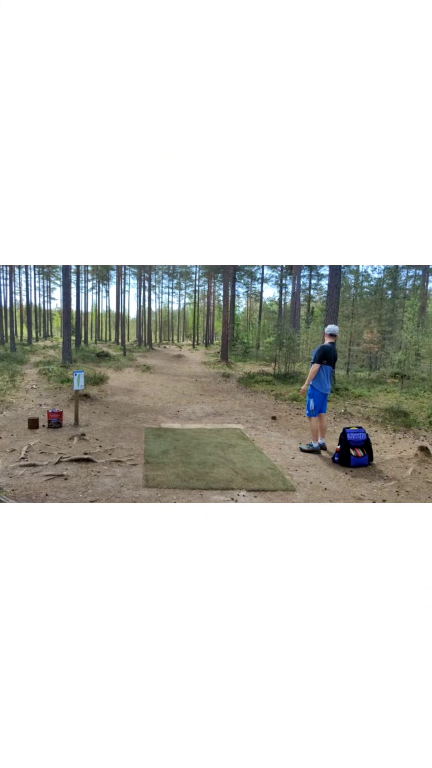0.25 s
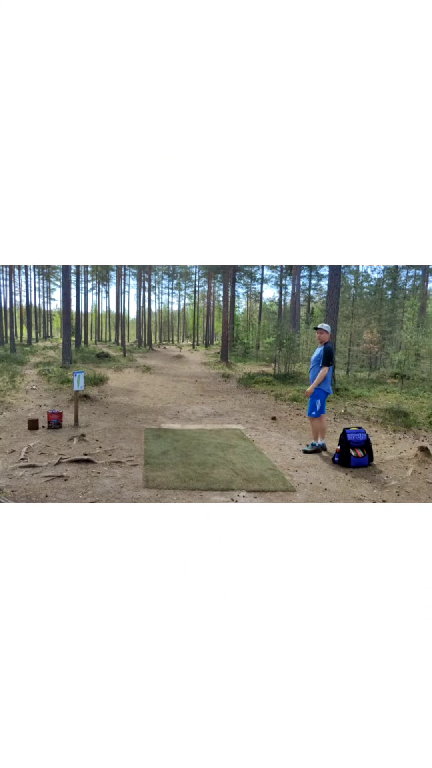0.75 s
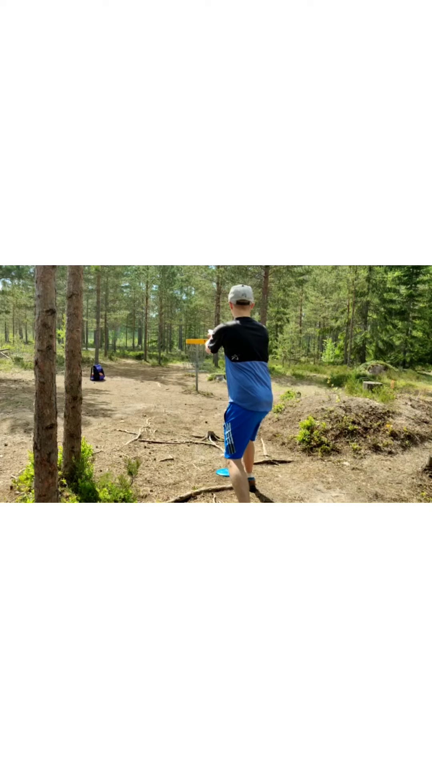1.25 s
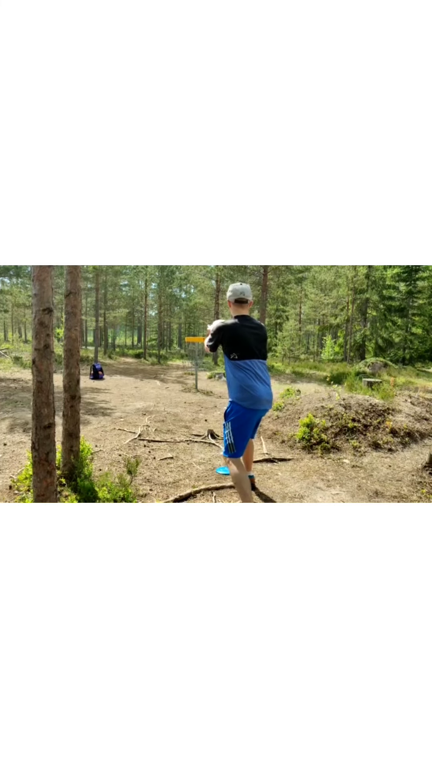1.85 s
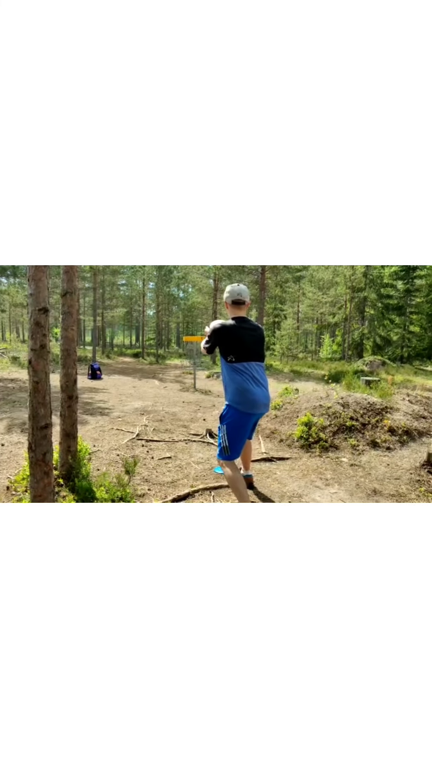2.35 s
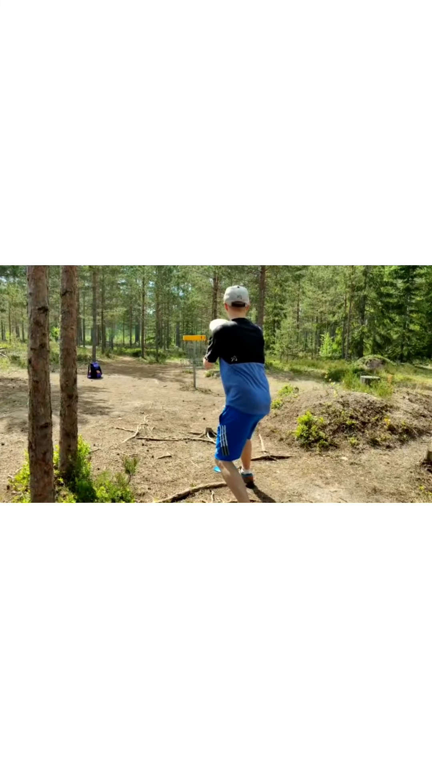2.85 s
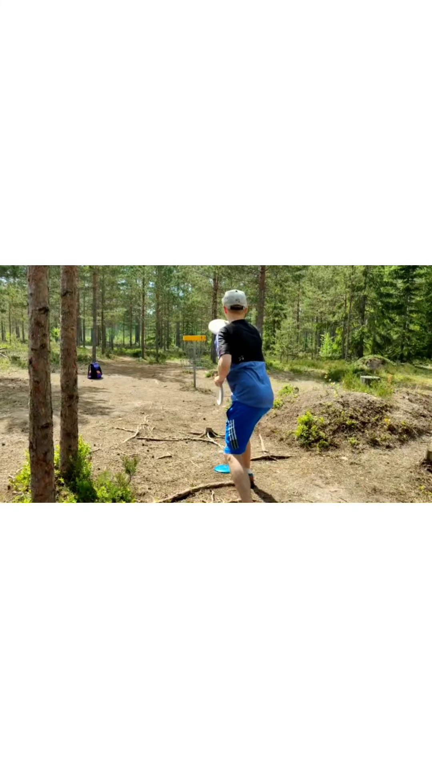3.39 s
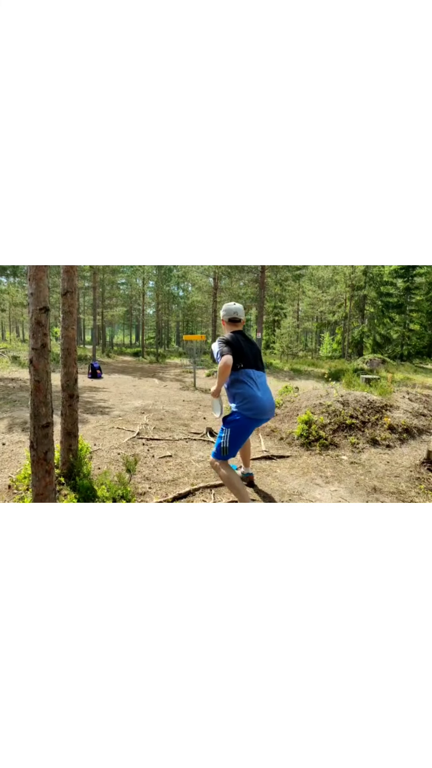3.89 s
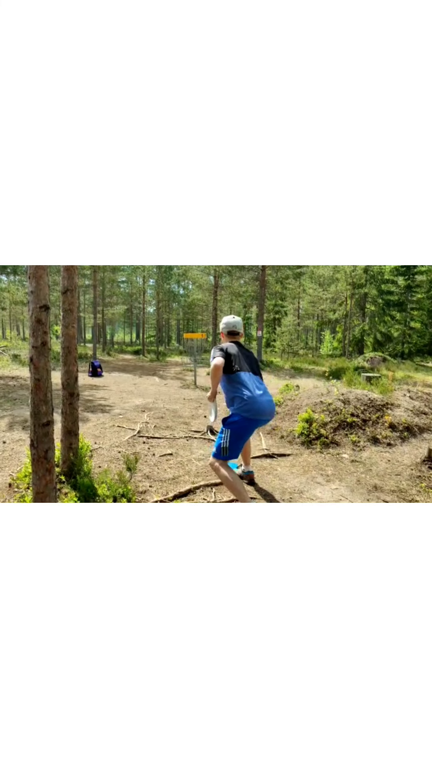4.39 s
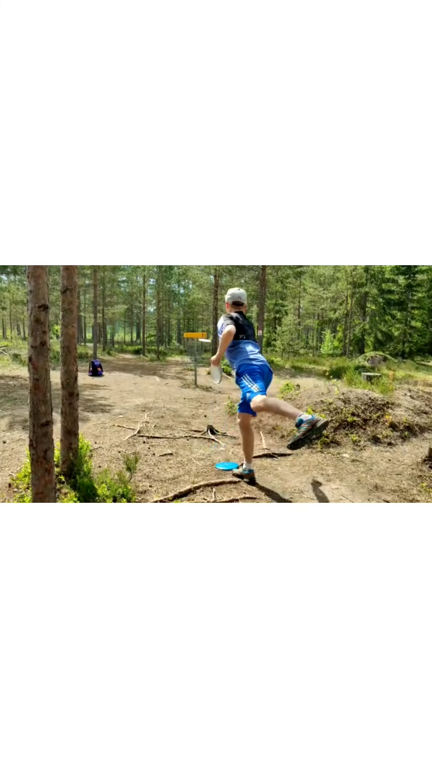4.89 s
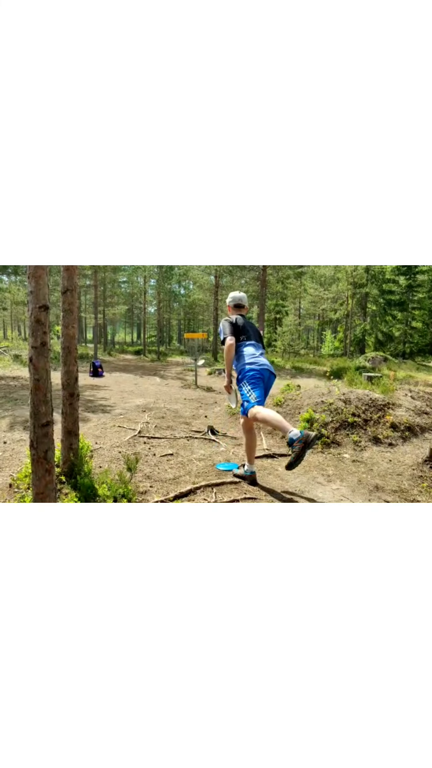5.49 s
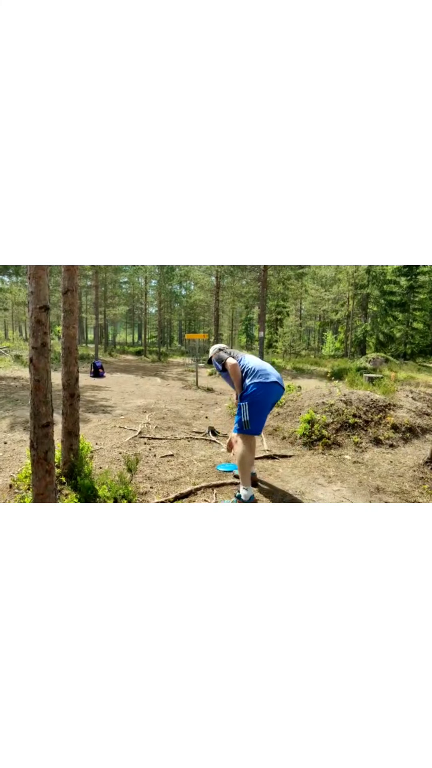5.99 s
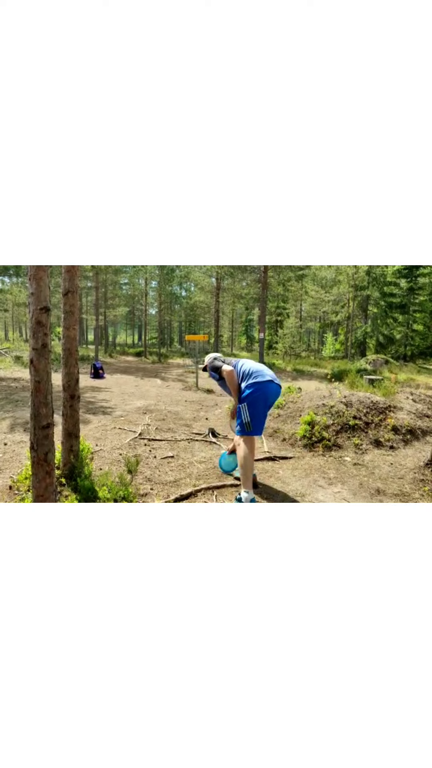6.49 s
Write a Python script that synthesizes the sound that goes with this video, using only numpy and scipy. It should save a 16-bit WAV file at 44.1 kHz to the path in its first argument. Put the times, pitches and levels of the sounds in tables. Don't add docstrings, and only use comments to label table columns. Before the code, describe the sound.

Quiet pine forest with far traffic and birdsong, a brief dropout, a soft throwing snap, then a disc crashes into steel chains that jangle and settle.

```python
import sys
import numpy as np
from scipy import signal
from scipy.fft import rfft, irfft, next_fast_len
from scipy.io import wavfile
from scipy.ndimage import uniform_filter1d, map_coordinates

SR = 44100
rng = np.random.default_rng(int(sys.argv[2]) if len(sys.argv) > 2 else 0)


def unload_wav(signal):
    wavfile.write(
        sys.argv[1],
        SR,
        np.round(np.clip(np.atleast_2d(signal).T, -1, 1) * 32767).astype(np.int16),
    )


def amplitude_ratio(level_db):
    exponent = np.asarray(level_db, float) / 20
    return 10 ** exponent


N = 297410

# (time [s], level [dB])
VIEW_GAIN = [
    (.9635, 9),
    (.9645, -89),
    (1.165, -49),
    (1.167, -7.5),
    (1.2, -5),
    (1.3, 2),
]
TOP_HZ = 15830

# (time [s], peak level [dB], length [s])
GUSTS = [
    (0.306, -57, 0.13),
    (0.434, -62, 0.051),
    (0.555, -50, 0.013),
    (0.713, -46.5, 0.065),
    (0.772, -44, 0.039),
    (0.916, -61, 0.03),
    (0.957, -44, 0.021),
]
# (frequency [Hz], density [dB per Hz])
RUMBLE = [(13, -36), (22, -3.5), (34, -2), (59, 3.5), (86, 1.5), (108, -7), (260, -24.5), (340, -56),
          (570, -120)]
# (frequency [Hz], density [dB per Hz])
ROAR_FIRST = [(120, -54), (200, -45), (265, -12), (308, -16.5), (431, -14.5), (845, 0.5), (1320, -4),
              (1700, -9.5), (3080, -35), (5000, -45), (6500, -76), (11000, -120)]
ROAR = [(120, -28), (200, -8), (292, -2), (507, -6), (595, -7), (690, -9), (967, 1.5), (1150, 3.5),
        (2140, -8), (3210, -48), (4370, -30.5), (5000, -34), (6500, -80), (11000, -120)]
# (frequency [Hz], density [dB per Hz])
HISS = [(2350, -46), (4000, -7), (5570, -6.5), (5820, -6.5), (7360, 1), (8580, -2), (10400, 0), (12100, -3),
        (13500, 4), (15600, -3)]
# (frequency [Hz], correlation [-])
ALIKE = [(60, 1), (130, 0.94), (290, 0.89), (640, 0.45), (1410, 0.013), (3100, 0.3), (6820, 0.49),
         (15000, 0.84)]
RUMBLE_DB, ROAR_DB, HISS_DB = (-61, -57.5), (-60.5, -61), (-82.5, -76.5)
BUILDS_DB_PER_S = 3
RUMBLE_DRIFT_DB, ROAR_DRIFT_DB, HISS_PATCHY_DB = 0.9, 0.8, 1.2
# (frequency [Hz], t60 [s])
TREES = [(200, 0.055), (2000, 0.83), (10000, 0.36)]

# (middle time [s], half length [s], level [dB])
CHORUS = [
    (1.7, 0.35, -67),
    (4.9, 0.27, -83),
]
# (frequency [Hz], density [dB per Hz])
TWITTER = [(1500, -120), (1900, 4), (2500, 2), (3200, 0), (3900, -5), (4400, -23), (5200, -120)]
MURMUR_DB = -79
LEVEL, RISE, LEAP, HOOK, WHIP = (.99, 1.01), (.92, 1.07), (.76, 1.35), (.98, 1.12), (.94, 1.16)
FALL, DIVE, SAG, ARCH, BOW, REACH = (1.1, .89), (1.22, .85), (1.14, 1.0), (.91, .88), (.94, .89), (.95, .99)
# (time [s], pitch ratio [-], level [dB])
ONCE = [(0, 1, 0)]
TRILL = [
    (0, 0.0069, DIVE, 3790, -21.5),
    (.007, 0.015, FALL, 3080, -6),
    (.048, .021, ARCH, 3010, 0),
]
TRILLS = [
    (1.114, .98, -64),
    (1.225, 1.001, -53.5),
    (1.333, 1.001, -52),
    (1.446, .99, -49.5),
]
FLOURISH = [(1.519, 0.019, BOW, 3000, -63), (1.558, 0.0096, LEVEL, 2930, -67),
            (1.59, 0.0076, LEAP, 5130, -70), (1.601, .008, DIVE, 5900, -75),
            (1.609, 0.0099, DIVE, 4400, -66), (1.624, 0.012, RISE, 4050, -56),
            (1.637, 0.007, RISE, 4090, -54), (1.644, 0.028, FALL, 2970, -59),
            (1.68, 0.0246, HOOK, 2550, -58.5), (1.704, 0.02, LEVEL, 2890, -57),
            (1.72, 0.024, LEVEL, 3050, -60), (1.736, 0.011, LEVEL, 3690, -53),
            (1.75, 0.0089, RISE, 3820, -54), (1.766, 0.013, LEVEL, 3005, -57.5),
            (1.968, .01, LEAP, 5200, -76)]
CHIPS = [(2.303, .0105, FALL, 3300, -74), (2.366, 0.011, FALL, 3400, -76), (2.443, 0.009, RISE, 3650, -72),
         (2.49, 0.011, RISE, 3810, -73), (2.7, 0.021, LEVEL, 3310, -68), (2.728, 0.029, RISE, 3640, -73)]
OPENING = [
    (3.264, .013, LEVEL, 6470, -75),
    (3.357, 0.032, LEVEL, 6300, -76),
    (3.38, 0.042, LEVEL, 6440, -75),
    (3.413, 0.009, DIVE, 5400, -78),
]
CLIMB = [
    (0, .009, RISE, 5000, -6),
    (.007, 0.02, LEVEL, 5330, -4),
    (.027, .017, WHIP, 5650, 0.5),
]
CLIMBS = [(3.49, 1.03, -75.5), (3.63, .97, -72)]
DROPS = [(3.562, 0.0056, FALL, 5700, -78), (3.566, 0.0067, FALL, 4930, -74), (3.689, .006, FALL, 5700, -67),
         (3.693, 0.0055, FALL, 4950, -66)]
SWOOP = [
    (0, .009, RISE, 4700, -3),
    (.021, .036, SAG, 5320, 0),
]
SWOOPS = [(3.806, 1.02, -67), (3.968, .98, -68)]
PIPES = [(3.773, 0.038, LEVEL, 3640, -69.5), (3.848, 0.023, LEVEL, 3640, -81),
         (3.935, 0.031, LEVEL, 3740, -68), (4.095, .129, BOW, 3730, -65.5), (4.29, 0.16, BOW, 3730, -65.5)]
SLUR = [
    (0, 0.035, LEVEL, 3060, 0.5),
    (.047, 0.049, WHIP, 3370, 2),
]
SLURS = [(4.542, 1, -72), (4.722, 1, -70), (4.902, 1, -69)]
PEEPS = [(4.607, 0.028, RISE, 3450, -68), (5.102, 0.038, REACH, 3490, -64), (5.212, 0.028, BOW, 3740, -71),
         (5.241, 0.012, RISE, 3550, -70), (5.325, 0.036, BOW, 3690, -71), (5.355, .01, RISE, 3550, -73)]

# (time [s], peak level [dB], frequency [Hz])
TICKS = [(0.7804, -59, 1300), (0.8475, -59, 4640), (0.851, -60, 6500), (0.856, -61, 5500),
         (1.6721, -47, 6935), (3.265, -56, 6420), (3.683, -64.5, 2600), (3.83, -62, 2600),
         (4.017, -46, 2500), (4.04, -60.5, 2400), (4.4694, -60, 9670), (4.6648, -54, 7300)]
# (middle time [s], half length [s], level [dB])
RUSTLE = [
    (1.665, 0.053, -74),
    (4.585, 0.08, -70.5),
]
# (frequency [Hz], density [dB per Hz])
CLOTH = [(300, -120), (500, 14.5), (1500, 8), (3500, 0.5), (5500, -18), (7500, 0.5), (9000, -10),
         (11000, -26), (14000, -2), (15800, -12), (16200, -120)]
# (time [s], peak level [dB], frequency [Hz])
SNAP = [
    (4.543, -41, 1200),
    (4.5474, -35.5, 1300),
    (4.557, -32, 600),
]

RING_HZ = [
    (1536, 1543, 1550, 1599),
    (4309, 4349, 4368, 4325),
    (8212, 8287, 8328, 8366),
    (13252, 13378, 13440, 13310),
]
# (level [dB], t60 [s])
RINGS = [
    [(-3, 1.04), (-11, 1.1), (-14, 1.8), (-11, 0.22)],
    [(0.5, 0.41), (1, 0.4), (1, 0.19), (-13.5, 0.44)],
    [(-4.5, 0.11), (0.5, 0.11), (3.5, 0.074), (-4.5, 0.085)],
    [(-5, 0.19), (-1, 0.054), (-5, 0.14), (-17, 0.066)],
]
# (frequency [Hz], level [dB], t60 [s])
LINK = [(8930, -18, .15), (10290, -9, .08), (10478, -4, .07), (10518, -3, .07), (11160, -8, .08),
        (12040, -10, .07), (12110, -13, .07), (14000, -15, .03), (14230, -24, .05)]
# (frequency [Hz], level [dB], t60 [s])
CAGE = [(940.6, -15, 0.16), (1117, -12.5, 0.12), (1720, -16, 0.37), (2046, -18, 0.16), (2120, -16, 0.11),
        (7860, -10, 0.1), (2242, -12.5, 0.14), (2442, -11, 0.13), (3010, -8, 0.027), (3183, -6, 0.039),
        (3343, -7, 0.033), (4585, -4.5, 0.072), (5160, -18, 0.23), (5400, -12, 0.066), (6508, -5, 0.044),
        (7000, -11.5, 0.037)]
# (frequency [Hz], level [dB], t60 [s])
POLE = [(341, -8.5, 0.19), (377.6, -6, 0.39), (413, -13, 0.11)]
# (frequency [Hz], density [dB per Hz])
CLATTER = [(71, -63), (120, -32), (347, -25.5), (523, -31), (760, -32), (950, -17), (1400, -15),
           (1550, -20.5), (1860, -15), (3100, -17.5), (3700, -22), (4300, -15), (5500, -20.5),
           (6700, -17.5), (8100, -14.5), (9340, -16.5), (13800, -13), (15900, -28)]
# (time [s], third mode peak level [dB], second mode over it [dB], fourth mode over it [dB])
BLOWS = [
    (5.4513, -17, 0, 0.6),
    (5.9295, -21.5, -13, -1.5),
]
SHOVES = [(5.4028, -29, -29, -13), (5.4345, -24.5, 1, -20), (5.4386, -24.5, 4.5, -34.5),
          (5.4435, -23.5, 7, -13), (5.4837, -23.5, 1.5, -12), (5.596, -30.5, -18, -8),
          (5.737, -33.5, 1, -8), (5.905, -28, -9, -20), (6.0251, -36.5, -34, -44), (6.032, -33.5, -21, -26),
          (6.0887, -35, -22, -9), (6.171, -40.5, -9, -21), (6.2072, -44, -19, -25), (6.704, -43, -7.5, -21)]
CLANGS = [(5.4299, -18, -15, -40), (5.6802, -34.5, -4, 16.5), (5.7068, -32, -4.5, 11.5),
          (5.8575, -24.5, -9.5, -17), (5.9424, -39, -10, -13), (5.9755, -30, -22, -3),
          (6.3747, -30.5, -4.5, 1), (6.474, -38, -4, -34), (6.5474, -38.5, -15, -14),
          (6.6449, -38, -4, -10.5)]
BLOW_LOW_DB, SHOVE_LOW_DB, CLANG_LOW_DB = -22, -18, -23
BURST_DB, BURST_T60_S = (-16, -11.5, -12), 0.065
# (time [s], level [dB])
BENDS = [(5.433, -39), (5.449, -31), (5.476, -33.5), (5.585, -42), (5.701, -47.5), (5.736, -51),
         (5.885, -43.5), (5.925, -45), (5.995, -48), (6.03, -39.5), (6.1, -54)]
RESTS_S, RESTS_DB = 6.23, -12
# (time [s], peak level [dB], upper modes over it [dB])
CHIMES = [(5.3932, -19, -1), (5.4026, -32, -7), (5.4132, -16, -13), (5.4934, -32, -16), (5.5363, -21, -10),
          (5.6061, -26, 0), (5.728, -25.5, 1), (5.7646, -22, 0), (5.7983, -23.5, -8.5), (5.9163, -33, 6),
          (6.028, -24.5, -4), (6.0786, -23, -8), (6.144, -31, -7.5), (6.3565, -48, 5), (6.4087, -41, -3),
          (6.4447, -41, 3), (6.5454, -57, -18), (6.7053, -50.5, 6)]
# (time [s], link level [dB], clatter level [dB], ring jostle level [dB])
LURCHES = [(5.3923, -27.5, -29.5, -52), (5.438, -61, -31, -17), (5.5, -38.5, -59, -32),
           (5.699, -38, -53, -37), (5.791, -42, -77, -55), (5.924, -41, -43.5, -49),
           (6.03, -50.5, -62, -50), (6.2, -89, -63, -54), (6.375, -57, -60, -41), (6.471, -67, -60, -55),
           (6.545, -64, -59, -65), (6.64, -61.5, -54, -64)]
LURCH_RISE_S = 0.0014
SETTLE_T60_S = (0.92, 0.26, 0.36)
LINGER_DB, LINGER_T60_S = (-14.5, -19, -19.5), 2.17
SWAY_S, LEFTMOST_S = 1.34, 5.48
# (time [s], level [dB], frequency [Hz], length [s])
THUDS = [
    (5.445, -41.5, 219, 0.066),
    (6.032, -56, 380, 0.03),
    (6.107, -49, 516, 0.047),
    (6.711, -59, 294, 0.024),
]
QUIET = int(5 * SR)


def unit(x):
    return x / np.sqrt(np.mean(x ** 2) + 1e-20)


def along(points, hz):
    f, v = np.transpose(points)
    return np.interp(np.log(hz + 1), np.log(f + 1), v)


def curves(rows):
    s, *cols = np.transpose(rows)
    return [np.interp(np.arange(N) / SR, s, c) for c in cols]


def wobble(rate):
    return map_coordinates(rng.standard_normal(int(N * rate / SR) + 4), [np.arange(N) * rate / SR])


def swells(rows, flat=2):
    t = np.arange(N) / SR
    return sum(amplitude_ratio(db) * np.exp(-np.abs((t - s) / half) ** flat) for s, half, db in rows)


def coloured(x, spectrum):
    m = next_fast_len(x.shape[-1] + 8192)
    gain = amplitude_ratio(along(spectrum, np.fft.rfftfreq(m, 1 / SR)))
    return irfft(rfft(x, m) * gain, m)[..., :x.shape[-1]]


def rush(spectrum, patchy_db):
    z = signal.stft(rng.standard_normal((2, N)), nperseg=512)[2]
    field = uniform_filter1d(rng.standard_normal(z.shape[1:]), size=6, axis=0)
    field = uniform_filter1d(field, size=12, axis=1)
    pair = signal.istft(z * amplitude_ratio(patchy_db * unit(field)), nperseg=512)[1][:, :N]
    likeness = np.clip(along(ALIKE, np.fft.rfftfreq(N, 1 / SR)), -1, 1)
    turn = np.arccos(likeness) / 2
    mid, side = irfft(rfft(coloured(pair, spectrum)) * [np.cos(turn), np.sin(turn)], N)
    return unit(np.array([mid + side, mid - side]))


def sides(pan_db):
    return amplitude_ratio(np.multiply.outer([.5, -.5], pan_db))


def echo(x, delay_s):
    hz, t, z = signal.stft(rng.standard_normal((2, SR // 2)), SR, nperseg=256)
    decay = amplitude_ratio(-60 * t / along(TREES, hz)[:, None])
    tail = signal.istft(z * decay, SR, nperseg=256)[1]
    late = np.pad(x, ((0, 0), (int(delay_s * SR), 0)))
    return signal.fftconvolve(late, tail / np.linalg.norm(tail[0]), axes=1)[:, :N]


def ringing(blows, hz, t60, rise_s=0.0012):
    r, w = amplitude_ratio(-60 / (t60 * SR)), 2 * np.pi * hz / SR
    soft = np.exp(-1 / (rise_s * SR))
    ring = signal.lfilter([0, r * np.sin(w)], [1, -2 * r * np.cos(w), r * r], blows)
    rise_poles = [1, -2 * soft * np.cos(w), soft * soft]
    return signal.lfilter([2 * (1 - soft) * np.sin(w)], rise_poles, ring)


def struck(s, levels_db, pan_db, modes, cling_db):
    out = np.zeros((2, N))
    at = np.round(s * SR).astype(int) - QUIET
    luck = rng.standard_normal((len(s), 2, len(modes)))
    for k, ((hz, t60), db) in enumerate(zip(modes, levels_db)):
        blows = np.zeros((2, N - QUIET))
        blows[:, at] = sides(pan_db + cling_db * luck[:, 0, k]) * amplitude_ratio(db + 2.85 * luck[:, 1, k])
        out[:, QUIET:] += ringing(blows, hz, t60)
    return out


def jostled(level_db, modes, rate, spread_db, alike):
    n, out = N - QUIET, np.zeros((2, N))
    when = (rng.random(n) < rate / SR) * amplitude_ratio(spread_db * rng.standard_normal(n))
    drive = amplitude_ratio(level_db[QUIET:]) * unit(when)
    for hz, db, t60 in modes:
        both, *each = rng.standard_normal((3, n))
        blows = drive * (np.sqrt(alike) * both + np.sqrt(1 - alike) * np.array(each))
        even = np.sqrt(4 * np.log(1000) / (t60 * SR))
        out[:, QUIET:] += amplitude_ratio(db) * even * ringing(blows, hz, t60)
    return out


def forest():
    t = np.arange(N) / SR
    first = t < 1
    rumble_db = np.where(first, RUMBLE_DB[0] + BUILDS_DB_PER_S * t, RUMBLE_DB[1])
    roar_db = np.where(first, *ROAR_DB)
    rumble = amplitude_ratio(rumble_db - 2.0 + RUMBLE_DRIFT_DB * wobble(2.25)) * rush(RUMBLE, patchy_db=0.6)
    tyres = np.where(first, rush(ROAR_FIRST, patchy_db=1.2), rush(ROAR, patchy_db=2.0))
    roar = amplitude_ratio(roar_db + 0.3 + ROAR_DRIFT_DB * wobble(3.18)) * tyres
    puffs = np.zeros(N)
    for s, db, long in GUSTS:
        puffs += amplitude_ratio(db) * np.exp(-((t - s) / long) ** 2) * np.sin(2 * np.pi * 56 * (t - s))
    hiss = amplitude_ratio(np.where(first, *HISS_DB)) * rush(HISS, HISS_PATCHY_DB)
    return rumble + sides([-1.5]) * roar + puffs + hiss


def far_birds():
    level = amplitude_ratio(MURMUR_DB) * (np.arange(N) > SR) + swells(CHORUS)
    return level * rush(TWITTER, patchy_db=-1.0)


def bird(phrases, pan_db, wet_db, rough):
    notes = []
    for syllable, sung in phrases:
        for s, ratio, db in sung:
            for after, long, glide, hz, above in syllable:
                notes.append((s + after, long, glide, hz * ratio, db + above))
    song = np.zeros(N)
    for s, long, (start, end), middle, db in notes:
        u = np.arange(int(long * SR)) / (long * SR)
        hz = middle * (start * (1 - u) * (1 - 2 * u) + 4 * u * (1 - u) + end * u * (2 * u - 1))
        whistle = np.sin(np.pi * u) ** 0.25 * np.sin(2 * np.pi * np.cumsum(hz) / SR)
        song[int(s * SR):][:len(u)] += amplitude_ratio(db + 0.5) * whistle
    song = sides([pan_db]) * song * (1 + rough * wobble(330))
    return song + amplitude_ratio(wet_db) * echo(song, delay_s=0.02)


def songbirds():
    finch_song = [(TRILL, TRILLS), (FLOURISH, ONCE), (CHIPS, ONCE)]
    warbler_song = [(OPENING, ONCE), (CLIMB, CLIMBS), (DROPS, ONCE), (SWOOP, SWOOPS)]
    piper_song = [(PIPES, ONCE), (SLUR, SLURS), (PEEPS, ONCE)]
    finch = bird(finch_song, pan_db=2.5, wet_db=-5.5, rough=0.44)
    warbler = bird(warbler_song, pan_db=9.0, wet_db=-2.5, rough=0.37)
    piper = bird(piper_song, pan_db=2.5, wet_db=-3.0, rough=0.21)
    return finch + warbler + piper


def player():
    level = swells(RUSTLE, flat=3.5)
    grain = amplitude_ratio(3.7 * wobble(330)) * rng.standard_normal((2, N))
    out = amplitude_ratio(11.5) * level * unit(coloured(grain + 3.9 * grain[::-1], CLOTH))
    t = np.arange(SR // 20) / SR
    for s, db, hz in TICKS:
        click = 0.5 * np.sin(2 * np.pi * hz * t) + 0.14 * rng.standard_normal(len(t))
        out[:, round(s * SR):][:, :len(t)] += amplitude_ratio(db - 60 * t / 0.0051) * click
    for s, db, hz in SNAP:
        knock = np.sin(2 * np.pi * hz * t) * np.minimum(t / 0.00029, 1)
        out[:, round(s * SR):][:, :len(t)] += amplitude_ratio(db - 60 * t / 0.011) * knock
    return out


def thuds():
    out = np.zeros(N)
    for s, db, hz, long in THUDS:
        u = np.arange(int(long * SR)) / (long * SR)
        spectrum = [(hz / 4, -40), (hz / 2, -6), (hz, 0), (2 * hz, -9), (6 * hz, -45)]
        dull = coloured(rng.standard_normal(len(u)), spectrum)
        out[int(s * SR):][:len(u)] += amplitude_ratio(db) * np.sin(np.pi * u ** 0.31) ** 2 * unit(dull)
    return out


def sway(s, middle_db, reach_db):
    return middle_db + reach_db * np.cos(2 * np.pi * (s - LEFTMOST_S) / SWAY_S)


def lurches():
    s, *levels = np.transpose(LURCHES)
    since = np.maximum(np.arange(N) / SR - s[:, None], 0)
    rise = 1 - np.exp(-since / LURCH_RISE_S)
    slow = amplitude_ratio(-60 * since / LINGER_T60_S)
    out = []
    for db, t60, linger_db in zip(levels, SETTLE_T60_S, LINGER_DB):
        shape = rise * (amplitude_ratio(-60 * since / t60) + amplitude_ratio(linger_db) * slow)
        out.append(20 * np.log10(amplitude_ratio(db) @ shape + 1e-8))
    return out


def chains():
    link_db, clatter_db, jostle_db = lurches()
    links = jostled(link_db - 3.0, LINK, rate=990, spread_db=0.0, alike=0.64)
    cage = jostled(clatter_db - 0.5, CAGE, rate=500, spread_db=3.0, alike=0.54)
    pole = jostled(link_db - 20.5, POLE, rate=410, spread_db=3.5, alike=1.0)
    above = np.repeat((-15.5, -14.5, -11, -11.0), len(RING_HZ[0]))
    db, t60 = np.reshape(RINGS, (-1, 2)).T
    ring_modes = zip(np.ravel(RING_HZ), db + above, t60)
    nudged = jostled(jostle_db - 3, ring_modes, rate=130, spread_db=3.5, alike=0.68)
    contacts = amplitude_ratio(2.991 * wobble(200)) * rng.standard_normal((3, N))
    scrape = unit(coloured(contacts[0] + 0.83 * contacts[1:], CLATTER))
    return links + cage + pole + nudged + amplitude_ratio(clatter_db + 5.0) * scrape


def chimes():
    s, db, upper = np.transpose(CHIMES)
    low = [db - 10.0, db - 14.0, db - 18.0]
    high = [db + upper - 7.5, db + upper - 9.5, db + upper - 21.0]
    modes = [(hz, t60) for hz, _, t60 in LINK[1:7]]
    return struck(s, low + high, sway(s, middle_db=-4.5, reach_db=9.5), modes, cling_db=6.5)


def hum():
    s, db = np.transpose(BENDS)
    modes = [(hz, t60) for hz, (_, t60) in zip(RING_HZ[0], RINGS[0])]
    levels = [db, db - 13, db - 16.5, db - 15]
    out = struck(s, levels, np.full(len(s), -3.0), modes, cling_db=-2.5)
    muted = np.clip((np.arange(N) / SR - RESTS_S) / 0.017, 0, 1)
    return out * amplitude_ratio(RESTS_DB * muted)


def rings():
    s, db, second, fourth = np.transpose(BLOWS + SHOVES + CLANGS)
    counts = (len(BLOWS), len(SHOVES), len(CLANGS))
    first = np.repeat((BLOW_LOW_DB, SHOVE_LOW_DB, CLANG_LOW_DB), counts)
    pan_db = sway(s, middle_db=0.0, reach_db=0.5)
    levels = []
    for above, family in zip((first, second, 0, fourth), RINGS):
        levels += [db + above + level - 10.5 for level, _ in family]
    modes = list(zip(np.ravel(RING_HZ), np.reshape(RINGS, (-1, 2))[:, 1]))
    out = struck(s, levels, pan_db, modes, cling_db=5.5)
    t = np.arange(SR // 10) / SR
    burst_db = db + np.repeat(BURST_DB, counts)
    for start, peak_db, side_db in zip(s, burst_db, pan_db):
        noise = unit(coloured(rng.standard_normal(len(t)), CLATTER))
        burst = noise * amplitude_ratio(peak_db - 60 * t / BURST_T60_S)
        seat = out[:, round(start * SR):][:, :len(t)]
        seat += (sides([side_db]) * burst)[:, :seat.shape[1]]
    return out


def scene():
    ambience = forest() + far_birds() + songbirds()
    basket = thuds() + chains() + chimes() + hum() + rings()
    return ambience + player() + basket + amplitude_ratio(-10.5) * echo(basket, delay_s=0.013)


def low_pass(x):
    return signal.sosfilt(signal.butter(12, 16820, fs=SR, output="sos"), x)


def record(dry):
    kept = irfft(rfft(dry) * (np.fft.rfftfreq(N, 1 / SR) < TOP_HZ), N)
    return low_pass(kept * amplitude_ratio(curves(VIEW_GAIN)[0]))


dry = scene()
out = record(dry)
unload_wav(out)
```